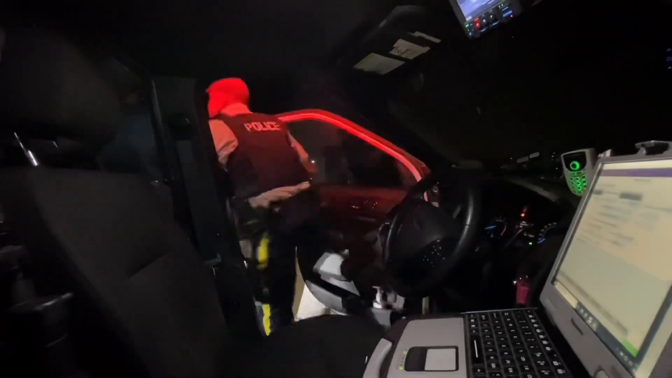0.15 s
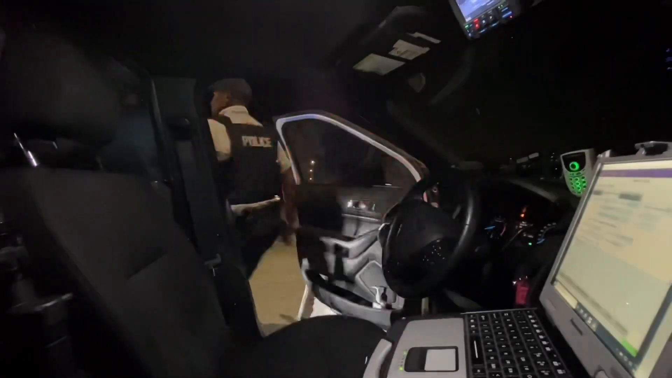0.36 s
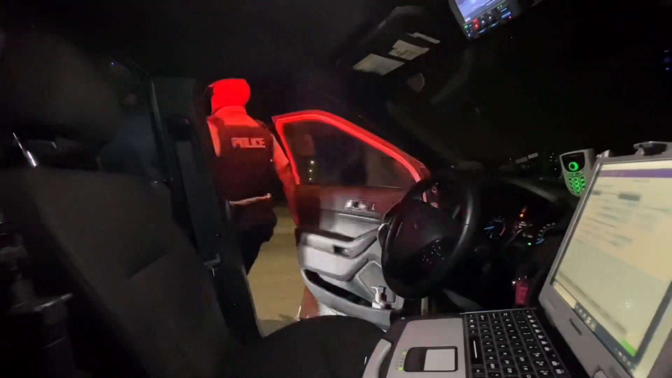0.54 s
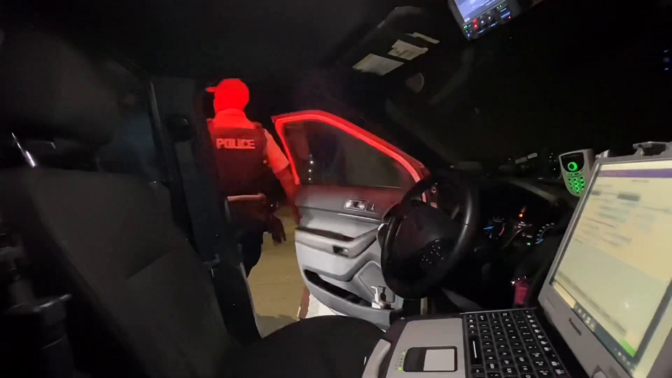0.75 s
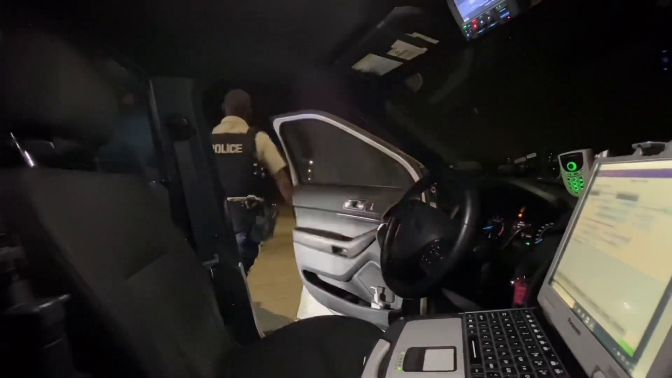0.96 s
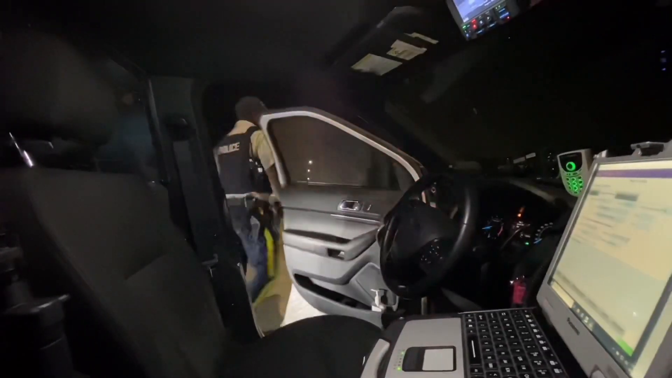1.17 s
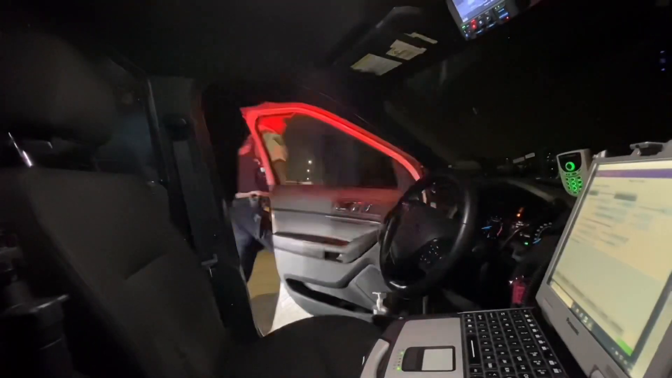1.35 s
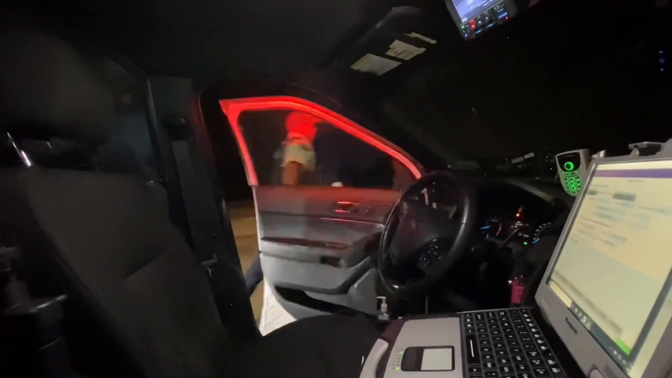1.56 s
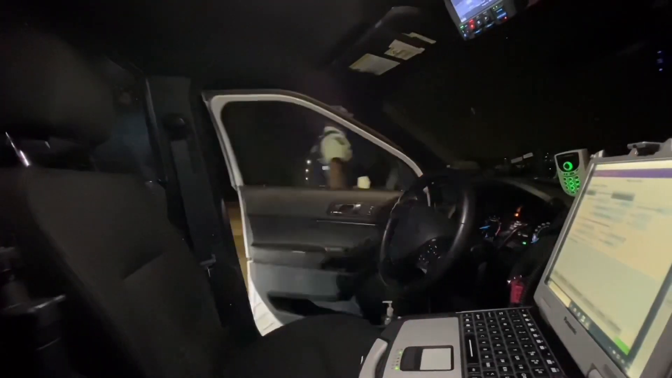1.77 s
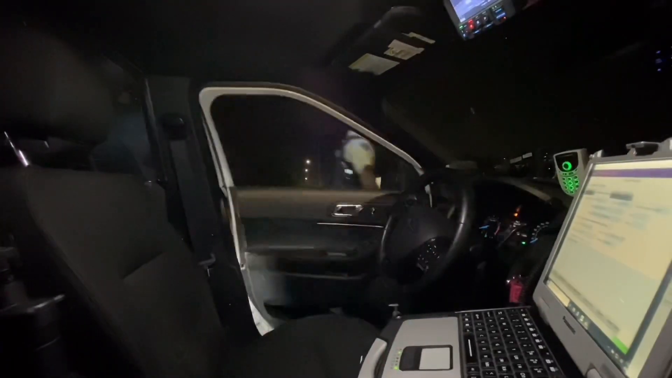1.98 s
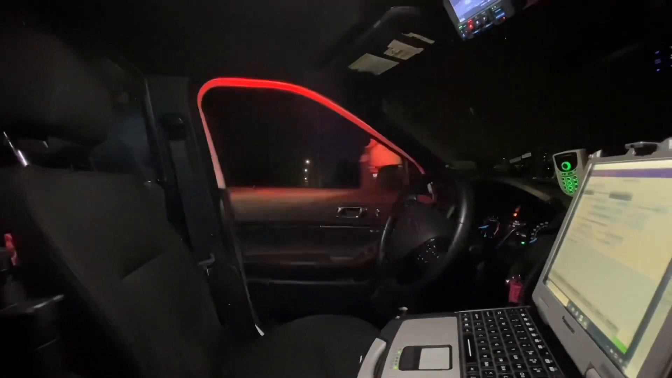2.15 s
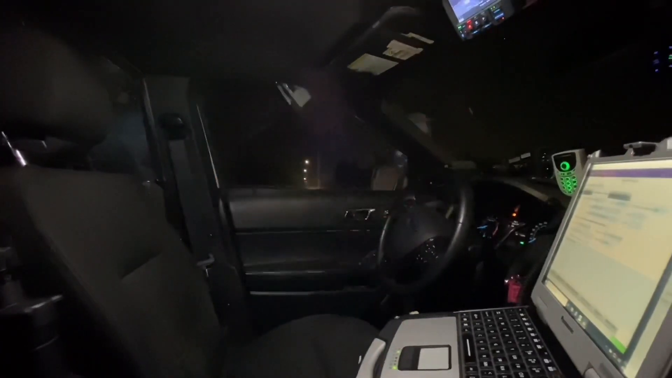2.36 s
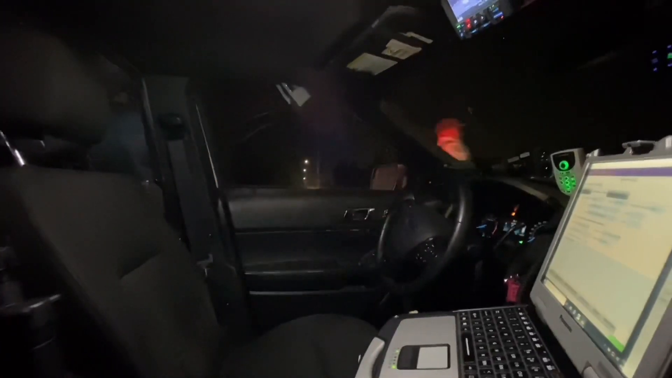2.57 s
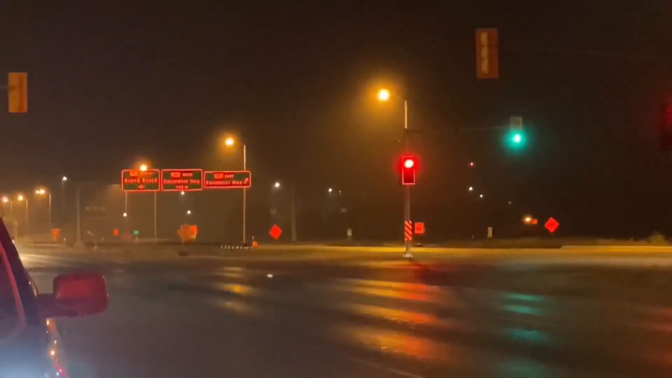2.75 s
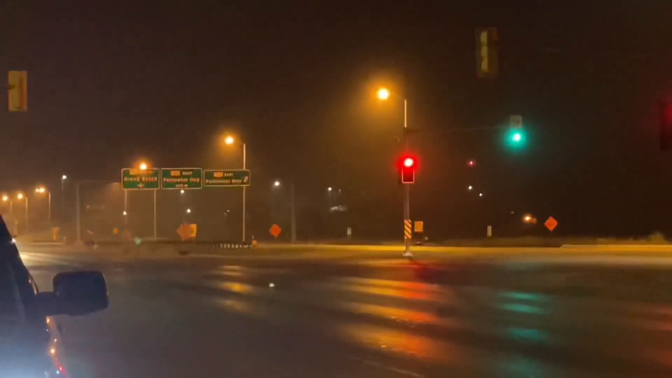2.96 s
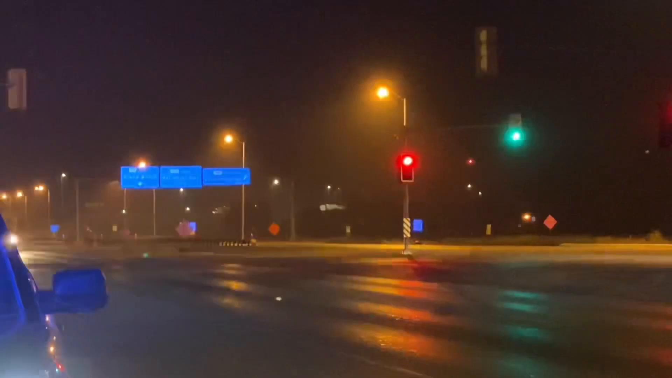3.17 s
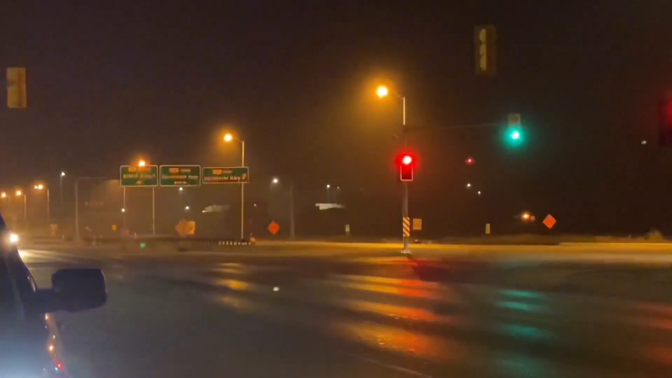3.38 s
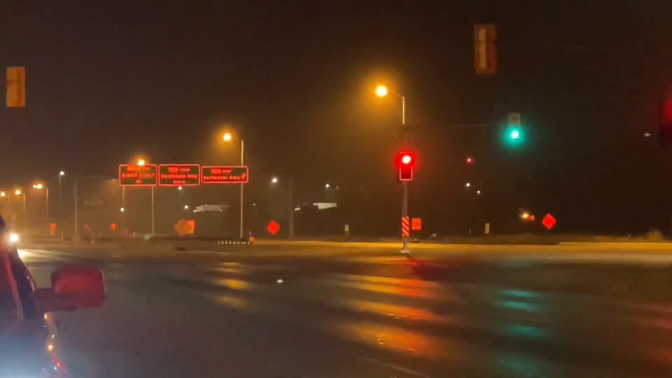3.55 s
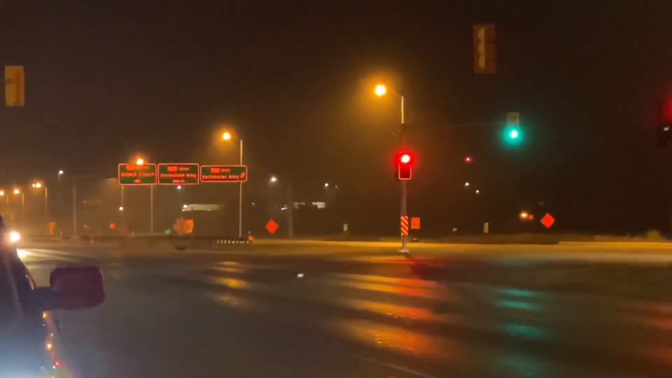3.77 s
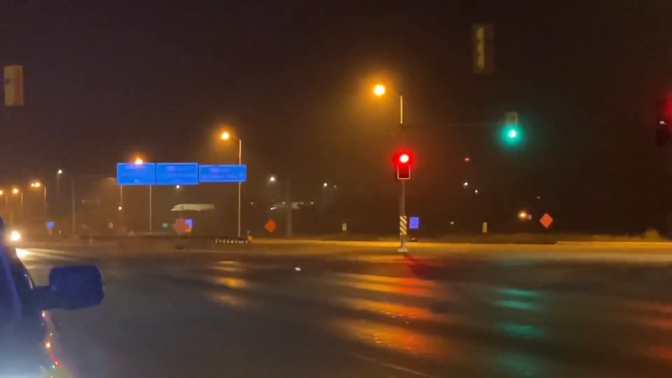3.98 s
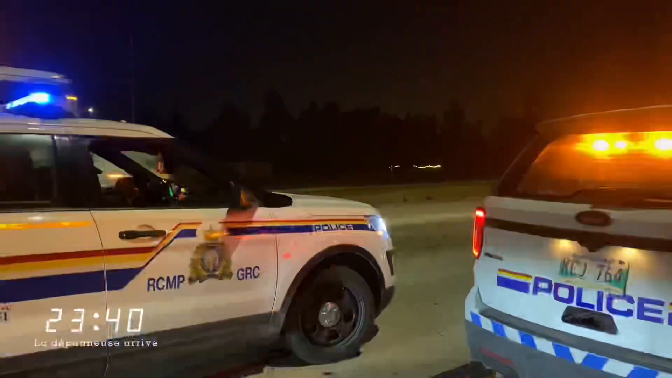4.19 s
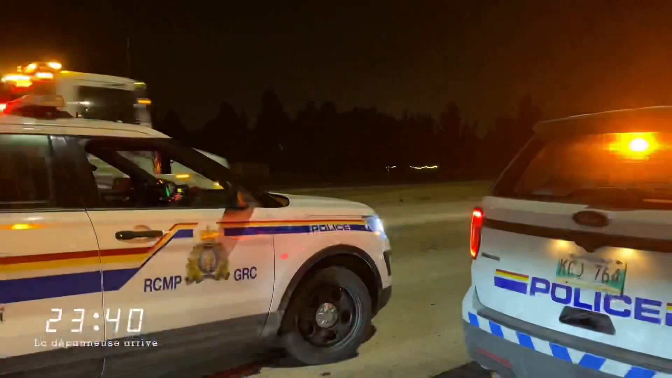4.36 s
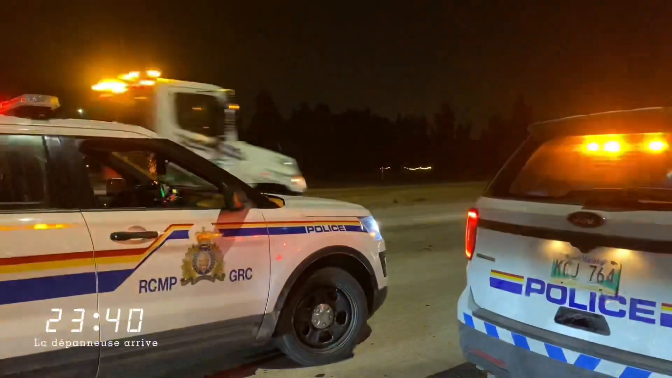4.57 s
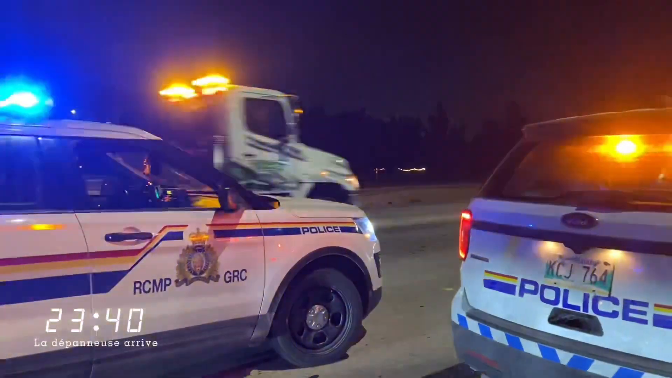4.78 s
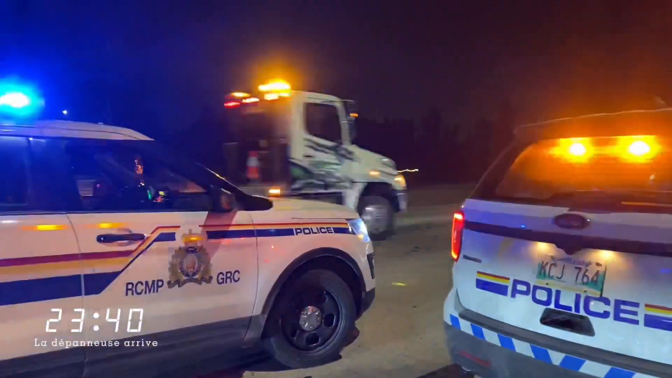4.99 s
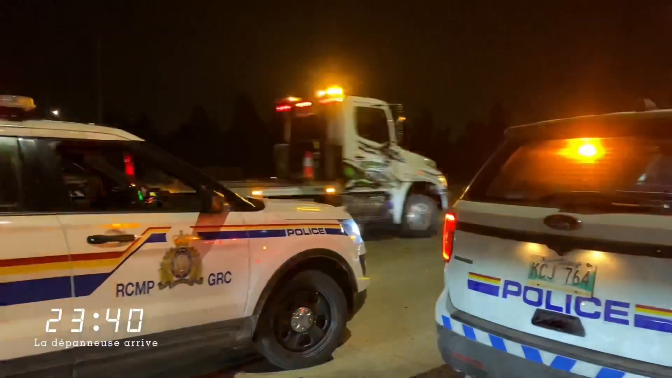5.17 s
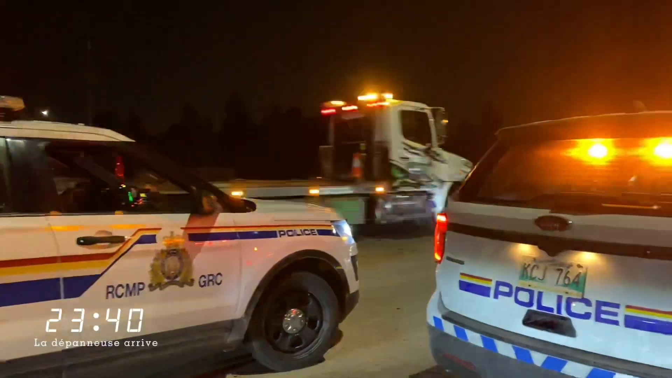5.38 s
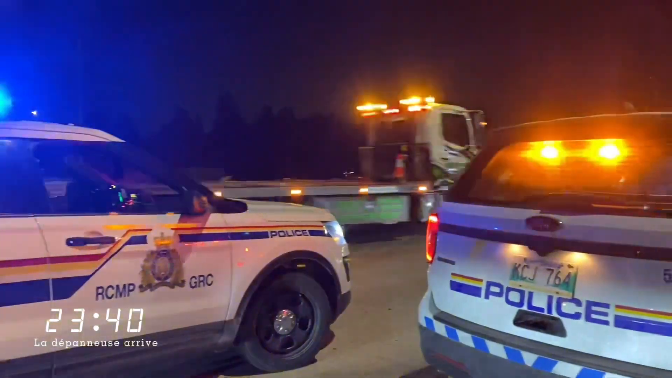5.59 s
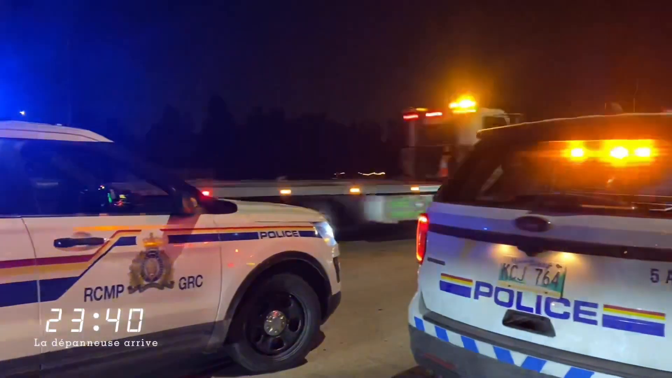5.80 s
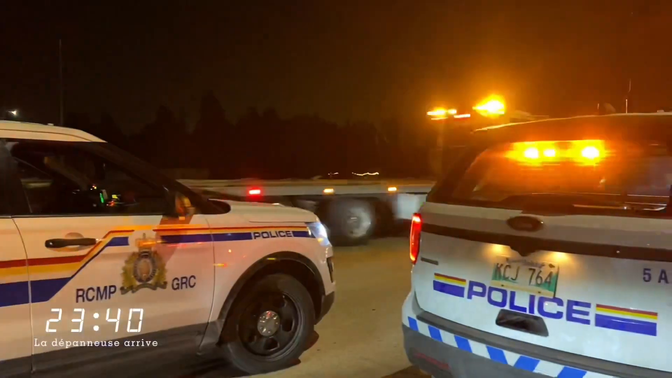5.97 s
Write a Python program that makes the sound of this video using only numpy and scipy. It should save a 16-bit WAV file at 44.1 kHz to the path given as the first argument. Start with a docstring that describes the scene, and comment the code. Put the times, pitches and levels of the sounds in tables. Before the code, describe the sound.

From 0 s we are inside a parked car, door open: soft low rumble, airy road noise and a very faint high whine. Close, slightly right, belt gear clicks at 0.05, 0.2, 0.32 and 0.4 s, with one more at 1.0. From about 1.2 s the road noise gradually dulls as the door swings. At 2.33 s it slams, by far the loudest event: dull panel crash, brief steel ring, deep falling thump, then shell shudder, trim rattle and small latch knocks to the left. At 2.68 s an abrupt cut outdoors: quieter idling engines, low hum and wet tyre hiss, with distant hollow knocks at 3.6 and, louder, 3.86 s. At 4.08 s another cut: a truck's deep exhaust boom near 58 Hz swells until 4.75, drops quickly and coasts away. Engine hum, tyres and light spray continue, with a tiny bright tick at 5.4, until about 6 s.

```python
"""Inside a parked car at night, then a wet crossing outdoors from two positions, joined by abrupt cuts.
In the car: belt gear clicks close by, road noise dulls as the door swings to, the door slams and the shell shudders.
At the crossing: idling engines and two far hollow knocks; then a truck whose exhaust booms as it rolls in.
Air, tyres, crashes and rustle are shaped noise; engines, thumps and rings are sines that drift or die away.
Each place reaches the left and right microphones with its own level and phase differences."""
import sys
import numpy as np
from scipy import signal
from scipy.fft import rfft, irfft, next_fast_len
from scipy.io import wavfile
from scipy.ndimage import uniform_filter1d, map_coordinates

SR = 44100
rng = np.random.default_rng(int(sys.argv[2]) if len(sys.argv) > 2 else 0)


def to_wav(sig):
    """Store sig (one row per channel, or 1-D mono) as 16-bit WAV at the path in sys.argv[1].

    Samples outside -1..1 are clipped; the rate is SR.
    """
    pcm = np.clip(np.atleast_2d(sig), -1, 1) * 32767
    pcm = np.round(pcm).astype(np.int16)
    wavfile.write(sys.argv[1], SR, pcm.T)  # frames by channels


N = 266083
T = np.arange(SR // 2) / SR  # the half second given to each short sound


def amp(db):
    """Decibels to amplitude."""
    return 10 ** (np.asarray(db) / 20)


def unit(x):
    """Scales to rms 1."""
    return x / np.sqrt(np.mean(x ** 2) + 1e-20)


def along(points, hz):
    """Reads (Hz, value) points along a log frequency axis."""
    f, v = np.transpose(points)
    return np.interp(np.log(hz + 1), np.log(f + 1), v)


def curves(rows):
    """One value per sample for each column after the time."""
    s, *cols = np.transpose(rows)
    return [np.interp(np.arange(N) / SR, s, c) for c in cols]


def wobble(rate, size=N):
    """A smooth random curve with `rate` knots a second."""
    knots = rng.standard_normal(int(size * rate / SR) + 4)
    return map_coordinates(knots, [np.arange(size) * rate / SR])


def filtered(x, response):
    """Applies a complex response given as a function of frequency."""
    m = next_fast_len(x.shape[-1] + 8192)
    return irfft(rfft(x, m) * response(np.fft.rfftfreq(m, 1 / SR)), m)[..., :x.shape[-1]]


def rush(spectrum, alike, patchy_db=0, size=N):
    """Coloured stereo noise of rms 1, its gain patchy in time and pitch, its sides alike by frequency."""
    z = signal.stft(rng.standard_normal((2, size + 512)), nperseg=512)[2]
    field = uniform_filter1d(rng.standard_normal(z.shape[1:]), size=6, axis=0)
    field = uniform_filter1d(field, size=12, axis=1)
    pair = signal.istft(z * amp(patchy_db * unit(field)), nperseg=512)[1][:, :size]

    def mid_side(hz):
        turn = np.arccos(np.clip(along(alike, hz), -1, 1)) / 2
        return amp(along(spectrum, hz)) * [np.cos(turn), np.sin(turn)]

    mid, side = filtered(pair, mid_side)
    return unit(np.array([mid + side, mid - side]))


def add(track, s, sound):
    """Mixes a short sound in at time s."""
    track[..., round(s * SR):round(s * SR) + sound.shape[-1]] += sound


def dying(db, t60, rise):
    """Envelope of a blow: a soft rise times a decay of 60 dB in t60 seconds."""
    return amp(db - 60 * T / t60) * (1 - np.exp(-T / rise))


def ring(hz):
    """A short steady sine."""
    return np.sin(2 * np.pi * hz * T)


def sweep(hz):
    """A sine that follows a pitch curve."""
    return np.sin(2 * np.pi * np.cumsum(hz) / SR)


def note(hz, drift):
    """A tone of rms 1 whose pitch drifts by a small share."""
    return np.sqrt(2) * sweep(hz * (1 + drift * wobble(6)))


def ambience(gains, spectra, alike, patchy_db):
    """Each distant layer has its own colour, level and patchiness, and wavers a little."""
    layers = zip(gains, spectra, patchy_db)
    return sum(gain * amp(0.43 * wobble(8.7)) * rush(colour, alike, patch_db)
               for gain, colour, patch_db in layers)


# Colours of the cabin air, one list each for low rumble, road and cloth rustle: hz, relative level_db [dB per Hz]
CABIN_AIR = [(11, -45), (18, -2.5), (92, -2), (133, -14), (176, -15), (200, -24.5), (406, -23),
             (500, -28.5), (650, -32), (1100, -120)], [(150, -51), (250, -27), (407, -4), (490, -36),
             (770, -1.5), (865, -7.5), (1010, -5.5), (1230, -7), (1580, -7), (4000, -23.5), (5200, -29),
             (8800, -120)], [(1470, -34), (2500, -6.5), (4270, -2), (5460, -9), (6510, -5.5),
             (10400, -10.5), (11700, -13.5), (12800, -46), (15600, -52)]
# Likeness of left and right in the cabin: hz, likeness [0 to 1]
CABIN_ALIKE = [(45, 0.99), (130, 0.7), (300, 0.83), (1000, 0.4), (2800, 0.058), (6000, 0.58), (10000, 0.11)]
# Levels with the door open, for rumble, road and rustle: level_db
OPEN_DB = (-41, -51.5, -64.5)
# What the closing door takes from the same layers: loss_db
SHUT_LOSS_DB = (2.5, 9.5, 18)
# The slam shakes the cabin in the same colours: level_db, then t60_s, per layer
SHAKE_DB = (-17.5, -42, -69)
SHAKE_T60 = (0.63, 0.3, 1.8)
# Stir of cloth and seat around each gear click: level over the click in db, per layer
STIR_DB = (-12.5, -24, -26)
STIR_S = 0.066  # time constant of the stir's power
SWING_S, MUFFLED_S = 1.15, 2.38  # the door starts to swing; its muffling is complete, just after the slam
MUFFLE_BEND = 1.84  # the muffling grows ever faster
THUD_S = 2.329  # the slam


def doorway():
    """Gain of each cabin layer: the door muffles the road, clicks stir cloth, the slam shakes everything."""
    t = np.arange(N) / SR
    muffling = np.clip((t - SWING_S) / (MUFFLED_S - SWING_S), 0, 1) ** MUFFLE_BEND
    stir = sum(amp(2 * db) * (t > s) * np.exp(-np.abs(t - s) / STIR_S) for s, db, *_ in GEAR)
    after = np.maximum(t - THUD_S, 0)
    gains = []
    for open_db, loss_db, stir_db, shake_db, t60 in zip(OPEN_DB, SHUT_LOSS_DB, STIR_DB, SHAKE_DB, SHAKE_T60):
        # doubled decibels are powers, so air and stir add as unrelated noise
        power = amp(2 * (open_db - loss_db * muffling)) + amp(2 * stir_db) * stir
        shake = amp(shake_db - 60 * after / t60) * (1 - np.exp(-after / 0.011))
        gains.append(np.sqrt(power) + shake)
    return gains


def cabin_air():
    """Rumble, road and rustle as noise layers whose levels follow door, clicks and slam."""
    return ambience(doorway(), CABIN_AIR, CABIN_ALIKE, patchy_db=(.3, 1.5, 1.5))


# Levels at the crossing: engines level_db, tyre hiss level_db
CROSSING = (-36, -46)
# Colours of engines and tyre hiss: hz, relative level_db [dB per Hz]
CROSSING_AIR = [(11, -51), (18, -35), (27, -15), (85, -1), (194, -16), (354, -18), (600, -29), (780, -28),
                (1320, -120)], [(210, -18), (350, -6.5), (444, -6), (1010, -6.5), (2280, -20.5),
                (2810, -20), (5920, -29), (10500, -35), (12600, -62)]
# Likeness of left and right: hz, likeness [0 to 1]
CROSSING_ALIKE = [(700, 0.98), (1000, 0.56), (1800, 1), (6000, 1), (8000, .6)]


def crossing_air():
    """Distant engines and tyres on the wet road as two nearly steady noise layers."""
    return ambience(amp(CROSSING), CROSSING_AIR, CROSSING_ALIKE, patchy_db=(.3, 1.2))


# Levels as the truck rolls in: start_s, engines level_db, tyres level_db, spray level_db
ARRIVAL = [(4.09, -37.5, -40, -52), (4.506, -34.5, -41.5, -56), (5.434, -37, -43, -50),
           (6.03, -37.5, -44, -58)]
# Colours of engines, tyres and spray: hz, relative level_db [dB per Hz]
ARRIVAL_AIR = [(11, -55), (18, -31), (42, -5), (70, 3.5), (127, -3), (200, -11.5), (238, -10), (600, -28.5),
               (780, -34), (1320, -120)], [(210, -3), (350, -2), (438, -2), (1030, -1.5), (1660, -8),
               (1940, -12.5), (2210, -8), (2830, -35), (4000, -21.5), (8800, -90)], [(1470, -19),
               (2500, -1.5), (2830, -3.5), (7140, -11.5), (8260, -19.5), (10600, -14), (12300, -27.5),
               (13400, -55)]
# Likeness of left and right: hz, likeness [0 to 1]
ARRIVAL_ALIKE = [(60, 0.94), (200, 0.95), (500, 0.76), (1000, 0.67), (2000, 0.67), (6000, 0.11)]


def arrival_air():
    """Engines, tyres and spray as noise layers that swell and sink on their own curves."""
    return ambience(amp(curves(ARRIVAL)), ARRIVAL_AIR, ARRIVAL_ALIKE, patchy_db=(.3, 1.2, 1.2))


# A thin whine in the cabin: pitch_hz, level_db, both unsteady around these
WHINE = (6370, -85.5)


def whine():
    """A sine that flickers in pitch and strength, and is gone once the muffling is complete."""
    hz, db = WHINE
    return (np.arange(N) < MUFFLED_S * SR) * amp(db + 4.6 * wobble(24.8)) * note(hz, drift=0.00295)


# Engine notes of waiting and passing cars: start_s, end_s, pitch_hz, level_db
HUMS = [(2.55, 3.04, 86, -33), (3.05, 3.95, 86, -42), (3.9, 4.34, 88, -37), (2.75, 4.05, 150, -45.5),
        (2.6, 4.1, 353, -52), (4.05, 4.403, 248, -46), (4.5, 6.1, 123, -42), (5.3, 6.1, 84, -46)]


def hums():
    """Drifting engine sines that swell in and out over about a tenth of a second."""
    t = np.arange(N) / SR
    out = np.zeros(N)
    for start, end, hz, db in HUMS:
        fade = np.clip(np.minimum(t - start, end - t) / 0.091, 0, 1)
        out += amp(db + wobble(6.8)) * fade * note(hz, drift=0.00385)
    return out


# Tick outdoors: start_s, level_db before the soft rise, t60_s
TICK = (5.404, -36.5, 0.0473)
# Dry snaps of cloth and plastic, also the colour of the tick: hz, relative level_db [dB per Hz]
SNAP = [(700, -25), (2600, -11), (4000, 1), (7000, -2), (11000, -2.5), (13500, -25), (15600, -40)]


def tick():
    """One short bright snap: a fast-dying burst of treble noise."""
    out = np.zeros((2, N))
    s, db, t60 = TICK
    add(out, s, dying(db, t60, 0.0011) * rush(SNAP, ARRIVAL_ALIKE, size=len(T)))
    return out


# Far hollow knocks: start_s, level_db before a 14 dB lift of the body, pitch_hz, t60_s, push level_db by that level
KNOCKS = [(3.5934, -16, 650, 0.015, -7), (3.8556, -5.5, 667, 0.011, -6.5)]
KNOCK_RISE_S = 0.0013
PUSH_HZ, PUSH_SAG_HZ, KNOCK_SAG_S = 130, 429, 0.0044  # the low push sinks to 130 Hz from 429 Hz above


def knocks():
    """A few soft-edged cycles of a hollow body over a low push, then scattered answers from nearby cars."""
    out = np.zeros(N)
    soft = 1 - np.exp(-T / KNOCK_RISE_S)
    push_tone = sweep(PUSH_HZ + PUSH_SAG_HZ * np.exp(-T / KNOCK_SAG_S))
    for s, db, hz, t60, push_db in KNOCKS:
        body = dying(db + 14, t60, KNOCK_RISE_S) * soft * ring(hz)
        push = dying(db + push_db, 0.028, KNOCK_RISE_S) * push_tone
        add(out, s, soft * (body + push))
    scatter = rng.standard_normal((2, len(T))) * dying(-37.0, .11, 0.0018)
    late = np.pad(out, (round(.014 * SR), 0))[None]  # the answers come 14 ms later
    return out + signal.fftconvolve(late, scatter, axes=1)[:, :N]


# Firing orders of the truck's engine: multiple of the firing pitch, level_db by the boom
BOOM_ORDERS = [(1, 3.5), (2, -17), (3, -16.5), (4, -24.5)]
PULL_S, LIFT_S = 4.085, 4.75  # the engine pulls, then the pedal lifts
BOOM_DB, SWELL_DB_PER_S = -25.5, 1.3
FADE_DB_PER_S = 300  # quick drop at the lift
COAST_DB, COAST_DB_PER_S = 9.5, 35  # then the boom coasts away more slowly
FIRING_HZ, SAG_HZ, SAG_S = 58.1, 1.7, .9  # pitch sinks around the lift


def truck():
    """Low firing orders boom in the exhaust while the engine pulls."""
    t = np.arange(N) / SR
    hz = FIRING_HZ - SAG_HZ * np.clip((t - LIFT_S) / SAG_S + .5, 0, 1)
    late = np.maximum(t - LIFT_S, 0)
    swell_db = SWELL_DB_PER_S * (np.minimum(t, LIFT_S) - PULL_S)
    drop_db = np.minimum(FADE_DB_PER_S * late, COAST_DB + COAST_DB_PER_S * late)
    turn = 2 * np.pi * np.cumsum(hz) / SR
    # the upper orders waver, the lowest holds
    tone = sum(amp(level + (k > 1) * 2.0 * wobble(8)) * np.sin(k * turn) for k, level in BOOM_ORDERS)
    onset = np.clip((t - PULL_S) / 0.034 + 0.37, 0, 1)
    return np.sqrt(2) * onset * amp(BOOM_DB + swell_db - drop_db + 0.33 * wobble(28)) * tone


# Belt gear clicks: start_s, level_db, pitch_hz, second pitch_hz, snap level_db by the click, t60_s
GEAR = [(.047, -37.5, 3670, 1090, -3.5, 0.017), (.2, -27, 1270, 3420, -0.5, 0.029),
        (.315, -33, 1720, 880, -10, .025), (.325, -34.5, 1100, 1550, -9, 0.028),
        (.403, -33.5, 1530, 2002, -4, 0.042), (0.993, -33, 1980, 3200, -25, 0.027)]
# Rough body of a click: hz, relative level_db [dB per Hz]
CLACK = [(300, -24), (900, -3), (1800, -6), (2800, -7), (4200, -8), (6000, -30)]
CLACK_DB = -4.5  # by the rings


def gear():
    """Buckles and belt gear close to the microphones: two short rings, a rough clack and a dry snap."""
    out = np.zeros((2, N))
    for s, db, hz, second_hz, snap_db, t60 in GEAR:
        rings = ring(hz) + 0.63 * ring(second_hz)
        body = rings + amp(CLACK_DB) * rush(CLACK, CABIN_ALIKE, size=len(T))
        body = body * amp(1.8 * wobble(510, len(T)))  # plastic chatters as it rings
        snap = amp(snap_db) * rush(SNAP, CABIN_ALIKE, size=len(T))
        add(out, s, dying(db, t60, 0.0034) * (body + snap))
    return out * amp([[-1.5], [1.5]])  # a little to the right


# Latch parts settling: start_s, level_db, pitch_hz, upper ring level_db by the low one, held_s
RINGS = [(2.482, -32, 420, -7, 0.0052), (2.516, -34, 660, -2.5, 0), (2.5785, -28, 663, 4.5, 0.0013),
         (2.612, -44.5, 760, -25, 0.0072), (2.646, -43, 660, -9, 0)]
RING_T60 = 0.023
UPPER_HZ, UPPER_T60, UPPER_SAG_S = 1650, 0.011, 0.00454  # starting pitch, decay, pitch time constant


def settling():
    """Rough little knocks to the left: a low ring, at times held by rubbing, under a shorter falling one."""
    out = np.zeros(N)
    upper_tone = sweep(UPPER_HZ * np.exp(-T / UPPER_SAG_S))
    for s, db, hz, upper_db, held in RINGS:
        pitch = hz + 12 * wobble(250, len(T))
        rough = amp(2.8 * wobble(330, len(T)))
        low_fade = amp(-60 * np.maximum(T - held, 0) / RING_T60) * (1 - np.exp(-T / 0.0011))
        upper = dying(upper_db, UPPER_T60, 0.00086) * upper_tone
        add(out, s, amp(db) * rough * (low_fade * sweep(pitch) + upper))
    return np.outer([amp(5), amp(-15)], out)


# The door meets seal and striker: start_s, level_db, rise_s, t60_s, treble level_db by the crash
LATCH = [(2.307, -16, 0.016, 0.16, -36), (2.325, -6.5, 0.0026, 0.077, -16.5),
         (2.331, -13.5, 0.00075, 0.14, -11.5), (2.345, -25.5, 0.006, 0.29, -11),
         (2.432, -39.5, .005, .07, -19)]
# Colour of the crash through the door panel: hz, relative level_db [dB per Hz]
PANEL = [(88, -11), (190, -3), (310, -14.5), (520, -7.5), (620, -19), (813, -9), (1000, -15), (1490, -13),
         (1670, -19.5), (2320, -19), (5460, -41), (10400, -39), (15600, -68)]
# Colour of the trim, also the treble of the crash: hz, relative level_db [dB per Hz]
TRIM = [(400, -33.5), (810, -8), (1050, -15), (2890, -14), (4110, -9), (10000, -18.5), (12200, -21.5),
        (13200, -50), (15600, -59)]


def latch_crash():
    """The latch crashes through the door panel: bursts of dull panel noise and brighter trim noise."""
    out = np.zeros((2, N))
    for s, db, rise, t60, treble_db in LATCH:
        crash = rush(PANEL, [(300, 0.45), (8000, 0.11)], patchy_db=1.3, size=len(T))
        bright = rush(TRIM, CABIN_ALIKE, size=len(T))
        add(out, s, dying(db, t60, rise) * (crash + amp(treble_db) * bright))
    return out


# Modes of the door steel: pitch_hz, level_db before a 23 dB cut, t60_s
CLANG = [(810, -2, 0.157), (1200, -4, .1), (1416, -11, 0.11), (1567, -12, .13), (2265, -13, 0.12),
         (2356, -10, .1)]
# The latch spring twangs: level_db, quick pitch_hz, long pitch_hz, t60_s
SPRING = (-30, 3714, 3930, .075)
SPRING_S = 2.362


def steel():
    """Door steel and latch spring ring as sines that flutter in strength."""
    out = np.zeros((2, N))
    for hz, db, t60 in CLANG:
        add(out, 2.331, dying(db - 23, t60, 0.00123) * amp(2.5 * wobble(120, len(T))) * ring(hz))
    db, quick_hz, hz, t60 = SPRING
    twang = ring(hz) + 2.5 * amp(-60 * T / 0.035) * ring(quick_hz)
    add(out, SPRING_S, dying(db, t60, 0.0019) * amp(5.8 * wobble(520, len(T))) * twang)
    return out


# The closing door pushes the shell, then it rocks back: start_s, floor and air level_db, skin level_db
REBOUNDS = [(2.293, -26.5, -38), (2.397, -11.5, -21), (2.4154, -32, -6.5), (2.472, -15.5, -24),
            (2.506, -15.5, -33), (2.575, -23, -29), (2.609, -25, -31)]
# Heaving floor, cabin air, door skin: pitch_hz, t60_s, rise_s
SHELL = [(44.2, 0.25, .003), (60.8, 0.21, .003), (99, 0.12, 0.0075)]
THUD_DB, THUD_RISE_S, THUD_T60 = 14, 0.017, 0.133  # level before the slow rise
THUD_START_HZ, THUD_END_HZ, THUD_SAG_S = 194, 54.6, .011


def thumps():
    """The squeezed cabin air drops in pitch as the seal gives; the shell rocks in low dying sines."""
    out = np.zeros((2, N))
    pitch = THUD_END_HZ + (THUD_START_HZ - THUD_END_HZ) * np.exp(-T / THUD_SAG_S)
    soft = (1 - np.exp(-T / THUD_RISE_S)) ** 2
    add(out, THUD_S, dying(THUD_DB, THUD_T60, THUD_RISE_S) * soft * sweep(pitch))
    for s, low_db, skin_db in REBOUNDS:
        for db, (hz, t60, rise) in zip((low_db, low_db, skin_db), SHELL):
            add(out, s, dying(db, t60, rise) * ring(hz))
    return out


RATTLE_S, RATTLE_GAP_S = 2.460, .0512
RATTLE_DB, RATTLE_T60 = -48.5, 0.075


def shudder():
    """Door skin and seats keep shaking as uneven low noise; loose trim slaps once each sway of the body."""
    out = np.zeros((2, N))
    colour = [(90, -20), (200, 0), (300, -6), (500, -5), (900, -14), (2200, -32), (4000, -90)]
    shaking = rush(colour, CABIN_ALIKE, size=len(T)) * amp(4.1 * wobble(63.0, len(T)))
    add(out, 2.35, dying(-25.5, 0.31, 0.03) * shaking)
    for sway in range(5):
        slap = rush(TRIM, CABIN_ALIKE, patchy_db=1.5, size=len(T))
        add(out, RATTLE_S + sway * RATTLE_GAP_S, dying(RATTLE_DB, RATTLE_T60, 0.0019) * slap)
    return out


def slam():
    """The door slam: latch crash, steel ring, low cabin thumps and what is shaken loose afterwards."""
    return latch_crash() + steel() + thumps() + shudder()


# Left and right microphones in each place: hz, left minus right level_db, lead of the right [radians]
CABIN_PORTS = [(40, -4, .8), (130, -9, 1.4), (320, -10, 2.5), (500, -8, 4.5), (720, -2, 6.3),
               (1000, -2, 6.9), (5000, -1, 6.3)]
CROSSING_PORTS = [(45, -1, .2), (300, 0, .6), (800, 0, 1.0), (1400, 0, 0)]
ARRIVAL_PORTS = [(45, -1, .3), (200, 1, .4), (320, -3, .4), (700, -4, -1.4), (1400, -1, -.7),
                 (6000, 0, -.3)]
CABIN_LAG = 0.000457  # s by which the right lags the left, before that lead


def ports(x, table, lag=0):
    """A place reaches the two microphones unequally in level and phase, split evenly between them."""
    side = np.array([[.5], [-.5]])
    rows = np.array(table)

    def response(hz):
        turn = 2 * np.pi * hz * lag - along(rows[:, ::2], hz)
        return amp(side * along(rows[:, :2], hz)) * np.exp(1j * side * turn)

    return filtered(x, response)


# Moments at which the place changes: start_s
CUTS = (2.677, 4.083)


def scene():
    """Car cabin, crossing and truck's arrival, joined by abrupt cuts."""
    engines = hums()
    cabin = cabin_air() + whine() + slam()
    crossing = crossing_air() + engines + knocks()
    arrival = arrival_air() + engines + tick() + truck()
    heard = [ports(cabin, CABIN_PORTS, CABIN_LAG) + gear() + settling(),
             ports(crossing, CROSSING_PORTS),
             ports(arrival, ARRIVAL_PORTS)]
    place = np.searchsorted(CUTS, np.arange(N) / SR)
    # a blend of 50 samples keeps each cut from clicking
    share = uniform_filter1d(1. * (place == np.arange(3)[:, None]), size=50, axis=1)
    return sum(part * sound for part, sound in zip(share, heard))


TOP_HZ = 15757  # band limit


def record(dry):
    """The loudest peaks are rounded off, and nothing is kept above the band limit."""
    rounded = dry / (1 + np.abs(dry / .98) ** 6) ** (1 / 6)
    return filtered(rounded, lambda hz: hz < TOP_HZ)


dry = scene()
out = record(dry)
to_wav(out)
```